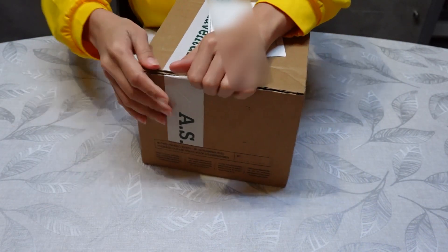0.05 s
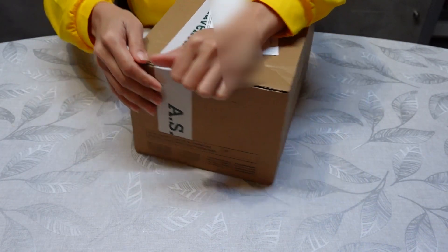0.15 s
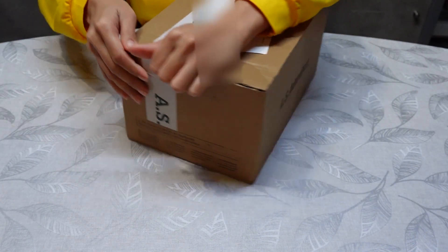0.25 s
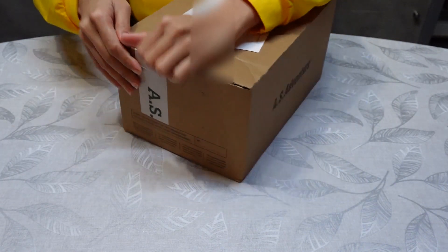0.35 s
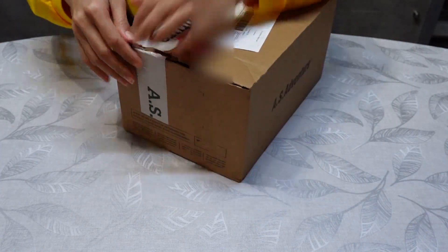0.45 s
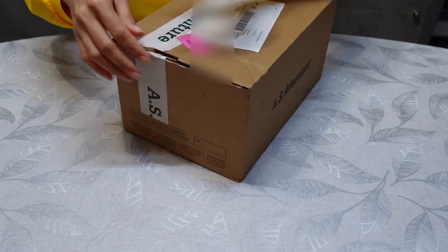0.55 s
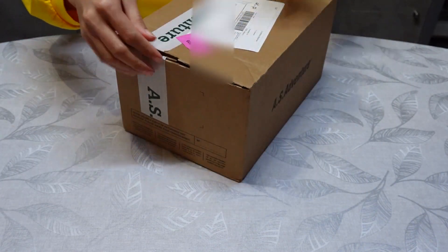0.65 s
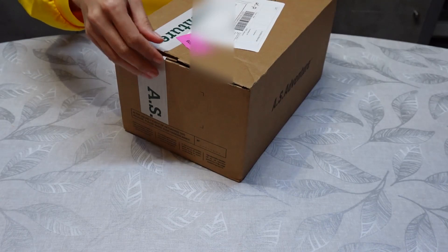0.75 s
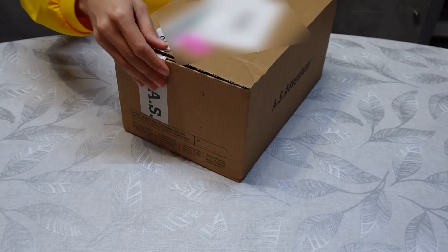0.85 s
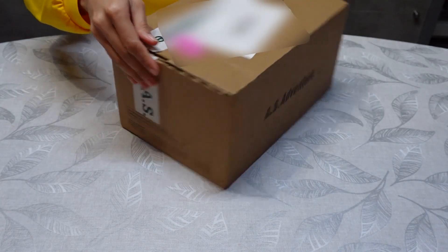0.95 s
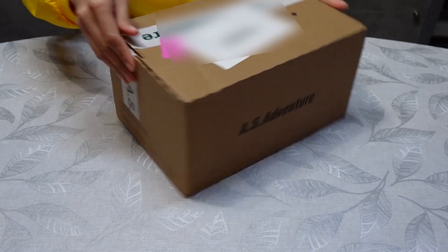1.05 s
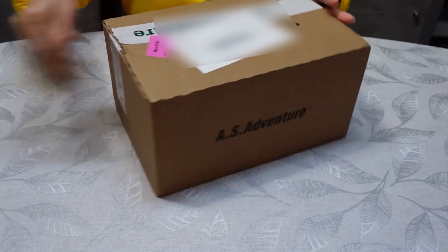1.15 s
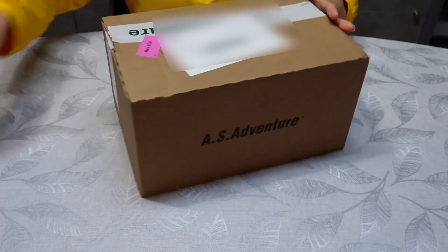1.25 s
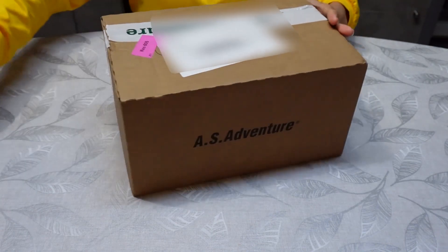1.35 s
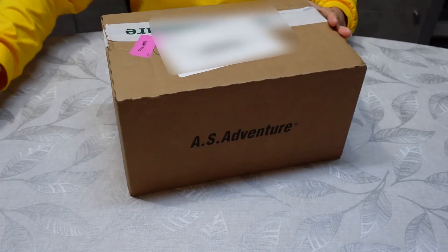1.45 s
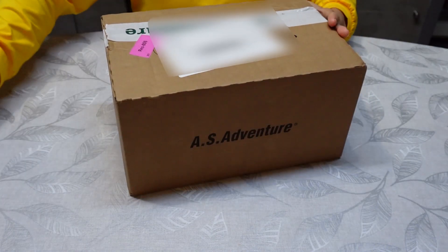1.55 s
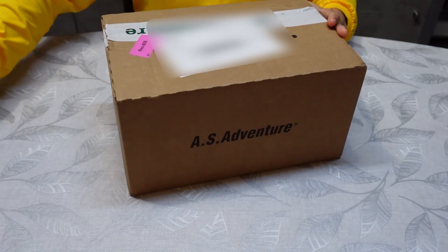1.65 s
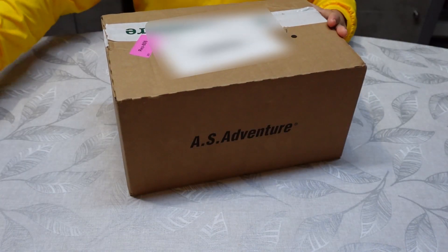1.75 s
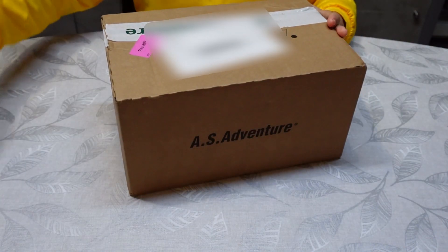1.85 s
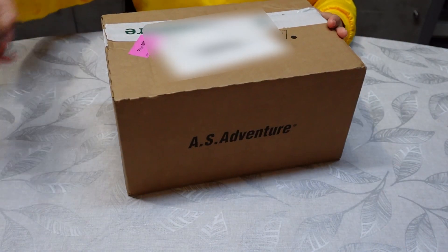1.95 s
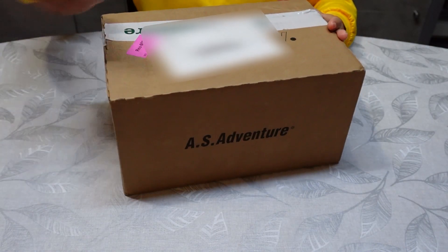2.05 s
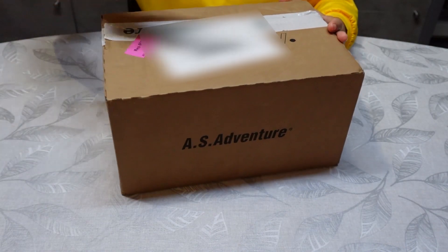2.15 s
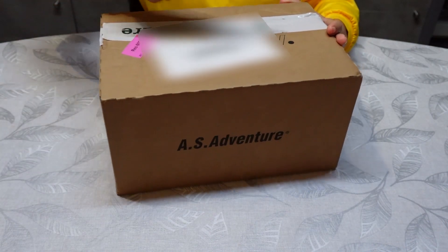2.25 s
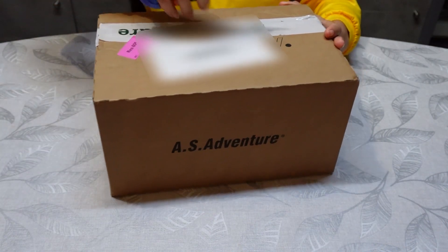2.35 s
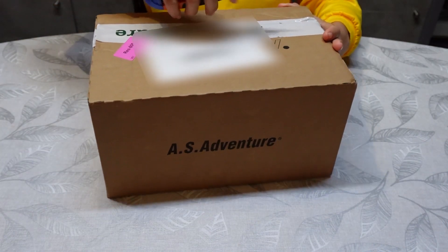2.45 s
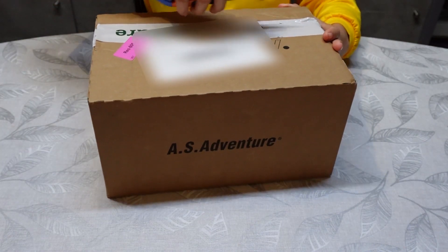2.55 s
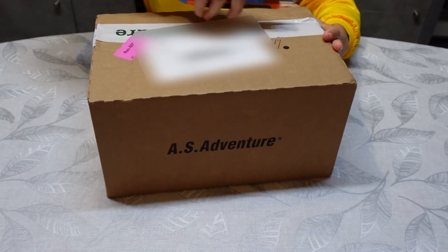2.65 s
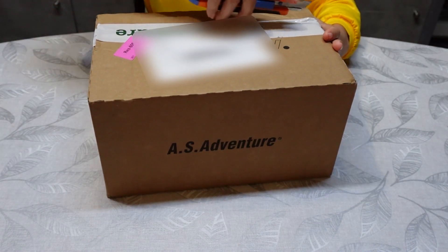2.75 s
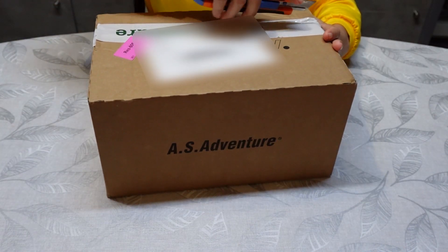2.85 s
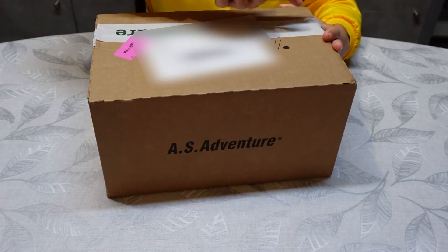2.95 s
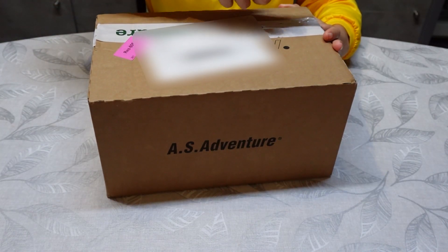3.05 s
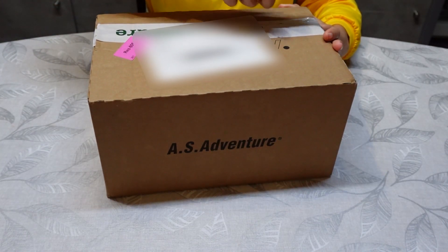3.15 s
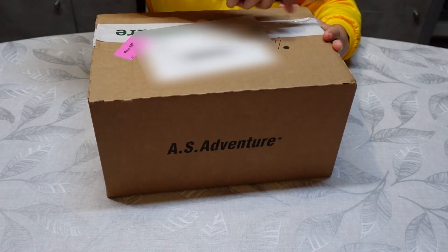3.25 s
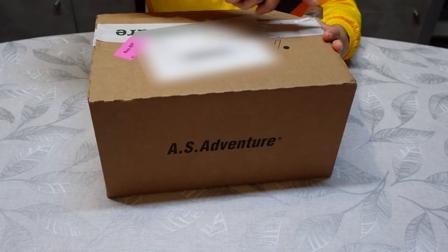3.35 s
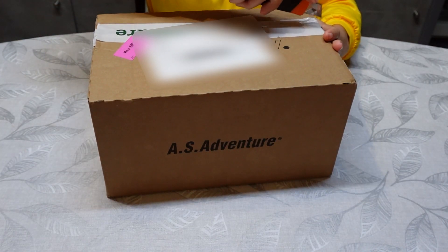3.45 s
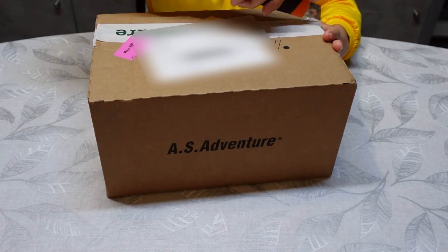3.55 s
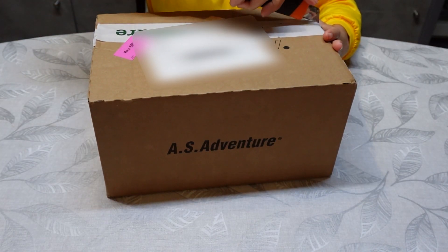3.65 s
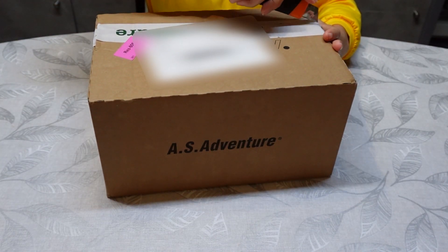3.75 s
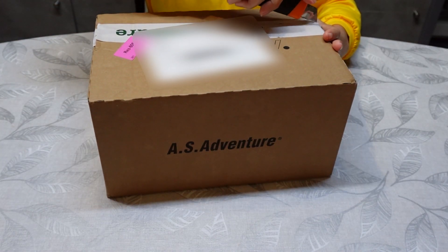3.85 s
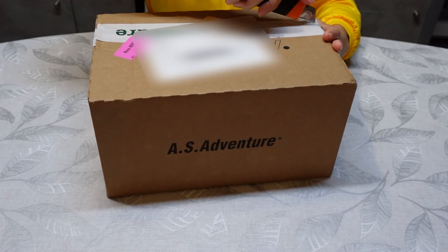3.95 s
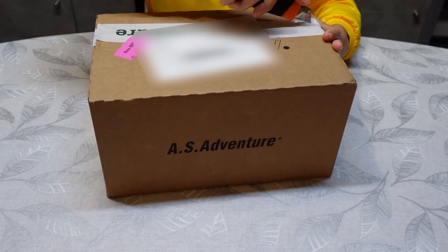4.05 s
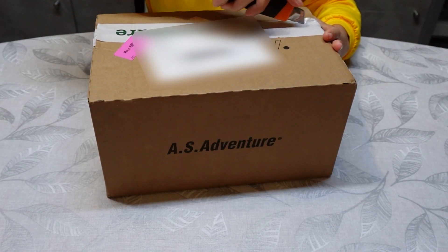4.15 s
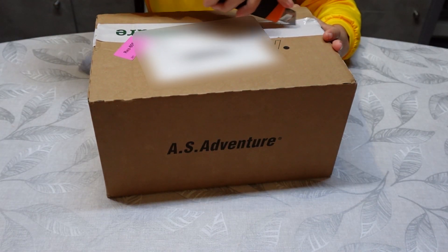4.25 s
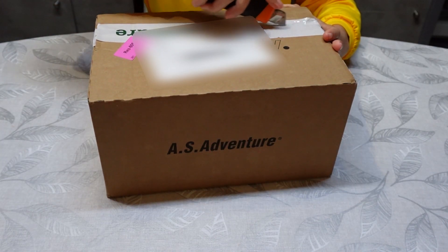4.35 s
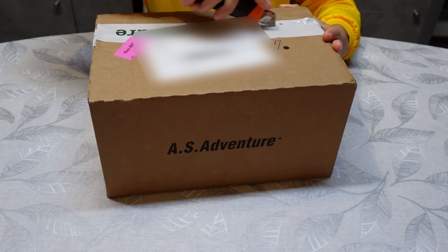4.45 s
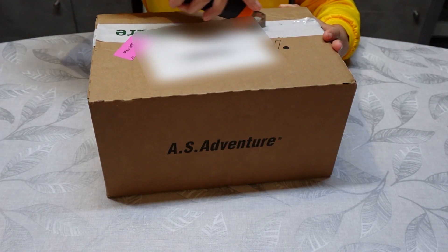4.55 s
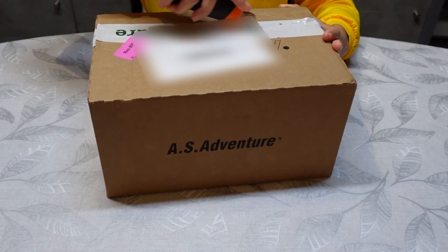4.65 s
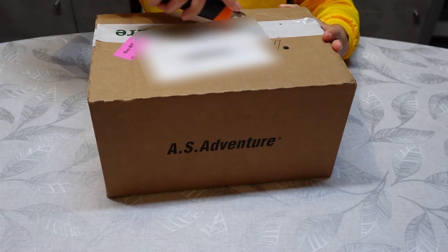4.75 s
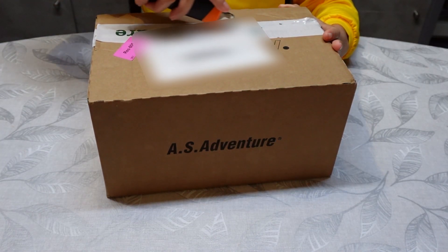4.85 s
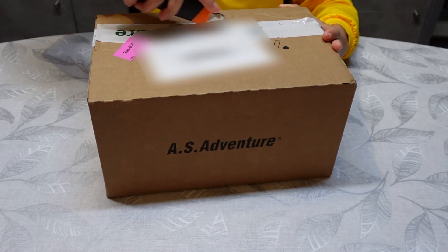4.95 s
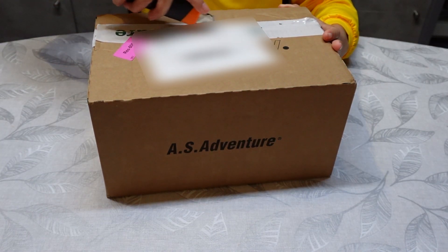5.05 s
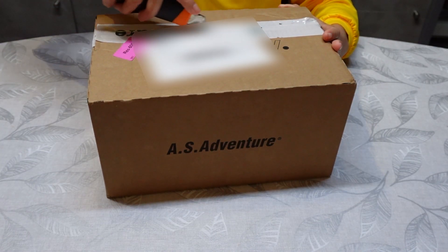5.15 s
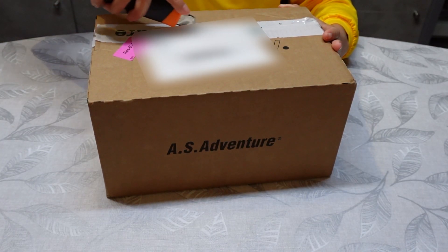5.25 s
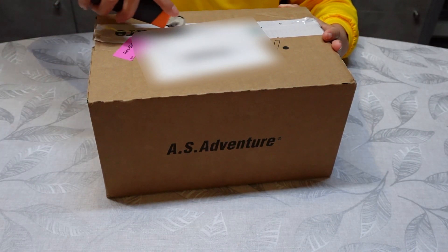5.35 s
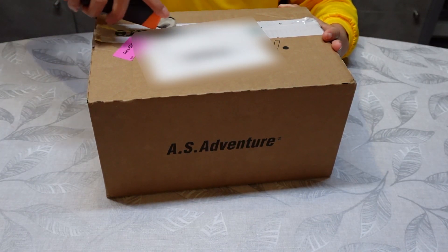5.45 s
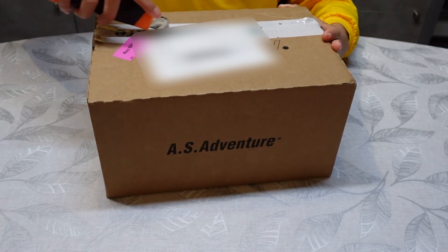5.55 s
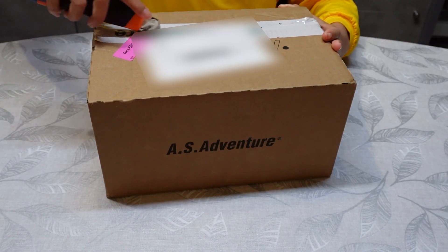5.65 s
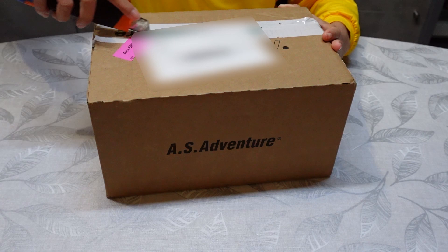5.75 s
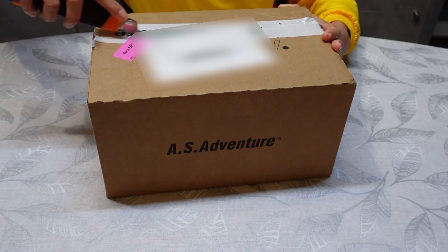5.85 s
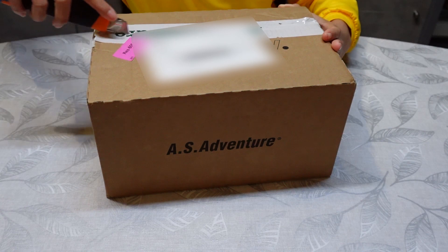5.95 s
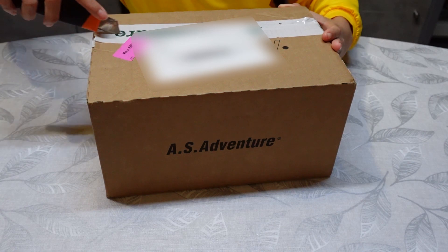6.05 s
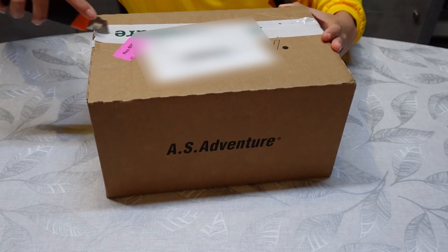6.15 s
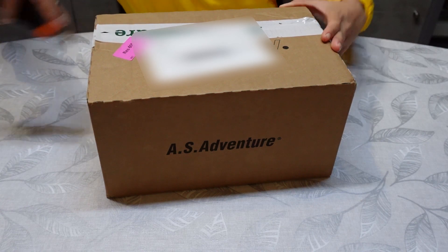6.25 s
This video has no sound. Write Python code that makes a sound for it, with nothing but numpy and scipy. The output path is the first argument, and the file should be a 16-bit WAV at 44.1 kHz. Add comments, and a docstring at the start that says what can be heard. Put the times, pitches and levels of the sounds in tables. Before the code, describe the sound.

A cardboard box hisses and bumps on a tablecloth, a utility knife clicks open, then its blade rasps in ragged strokes through packing tape.

```python
"""A small, lively room: a taped cardboard box is turned on a tablecloth, hissing and bumping.
A utility knife clicks in the hand, then its blade rasps through the packing tape,
catching on one ridge of the corrugated board after another.
Rubbing and tearing are trains of tiny random impulses, coloured by filters; hollow bumps are fading tones.
Everything except the faint hiss also feeds the room's echoes."""
import sys
import numpy as np
from scipy import signal
from scipy.io import wavfile
from scipy.ndimage import uniform_filter1d

SR = 44100
rng = np.random.default_rng(int(sys.argv[2]) if len(sys.argv) > 2 else 0)


def inscribe(sig):
    """Save sig as 16-bit PCM at rate SR to the path in sys.argv[1].

    A 1-D sig is mono; a 2-D sig holds one channel per row.
    Samples are clipped to [-1, 1] before scaling.
    """
    pcm = np.round(np.clip(np.atleast_2d(sig).T, -1, 1) * 32767)
    wavfile.write(sys.argv[1], SR, pcm.astype(np.int16))


N = 277830  # length in samples

# Levels in the tables come before each layer's own level setting.
# "brightness" blends a dull and a bright sound: -5 is all dull, +5 all bright, values beyond are clipped.

# the box sliding on the cloth, one list a push: start_s, level_db, brightness (-5 to 5)
SLIDES = [
    [(0.0, -29.5, 0.5), (0.09, -32, 0.5), (0.154, -36.5, 1), (0.24, -35, 1), (0.305, -32.5, 2),
     (0.396, -37, 0.5), (0.456, -33, 1.5), (0.47, -49, -1)],
    [(0.865, -40, 2.5), (0.975, -39.5, -0.5), (1.008, -29.5, 3.5), (1.077, -24, 3), (1.319, -36.5, 1),
     (1.4, -46, 3)],
]
# the colour of cardboard on cloth: pitch_hz, level_db
SLIDE_COLOUR = [(70, -53), (130, -28), (320, -12.5), (450, -11), (560, -25), (760, -18.5), (1100, 0),
                (1700, 7), (2300, 5.5), (3050, 8), (4300, 1), (6000, -6), (10000, -15.5), (15500, -22.5)]
# soft bumps of hands and box: start_s, level_db, pitch_hz
BUMPS = [(.046, -29.5, 236), (.066, -32, 202), (.070, -30.5, 349), (.127, -38, 333), (.19, -47, 214),
         (.872, -42.5, 164), (.925, -38.5, 300), (.951, -43.5, 227), (1.019, -47, 338), (1.164, -47.5, 305),
         (1.262, -51, 304), (1.468, -34, 295), (1.535, -42, 300), (1.733, -41, 305), (1.743, -47.5, 132),
         (1.762, -39.5, 376), (1.982, -54, 330), (3.660, -46.5, 379), (3.662, -58, 149)]
# short scuffs and clatters of handling: start_s, level_db, fade_s, treble_db_per_octave
SCUFFS = [(.865, -39.5, 0.018, 7.5), (0.906, -37.5, .02, 13), (1.429, -37.5, 0.0096, -2.5),
          (1.439, -32.5, 0.039, -1), (1.73, -33, 0.042, -1.5), (3.658, -41.5, 0.0097, -3.5)]
# the colour of the scuffs: pitch_hz, level_db
SCUFF_COLOUR = [(60, -35), (130, -22.5), (220, -15), (340, -6.5), (560, -22), (850, -10), (1250, -14.5),
                (1550, -7), (1850, -7), (2500, -2), (4500, -3), (7000, -6.5), (10000, -14), (15000, -17)]
# clicks of the knife and of fingernails on the box: # start_s, level_db, ring_hz, treble_db_per_octave
CLICKS = [(0.0627, -26.5, 1650, -1.5), (.954, -34, 2700, -9), (1.6887, -38, 2670, -2.5),
          (1.706, -36.5, 2820, -3), (1.9806, -42, 2570, -8), (2.0489, -22.5, 4000, -1),
          (2.127, -35, 3000, -4), (2.2995, -38.5, 3120, -2.5), (2.36, -35, 2720, -3),
          (2.3684, -26, 4400, -2), (2.7094, -38.5, 2780, -6), (2.759, -51, 2830, -3),
          (2.794, -48.5, 2820, -6), (2.92, -44.5, 2880, -7), (3.0035, -42.5, 3110, -1),
          (3.0328, -39, 3330, -7), (3.0382, -26.5, 3100, -5.5), (3.087, -41, 2600, -7),
          (3.149, -48, 2620, -6), (3.2645, -24.5, 3720, -1), (3.659, -34, 3680, 3),
          (3.8065, -24.5, 3430, 3), (3.928, -38, 2730, -2), (4.0312, -23, 2640, 2), (4.2097, -21, 4100, -4)]
# the colour of the knife: pitch_hz, level_db
KNIFE_COLOUR = [(300, -49), (750, -51), (1000, -27), (1350, -20.5), (1650, -5), (1900, -7.5), (2600, 3.5),
                (3300, 1.5), (4300, 1.5), (5500, -2.5), (8000, -3.5), (11000, -16.5), (16000, -34)]
# the blade tearing through a ridge: start_s, level_db
RIDGES = [(4.075, -36), (4.27, -45), (4.319, -32), (4.36, -36.5), (4.406, -35.5), (4.453, -36),
          (4.493, -38), (4.545, -34.5), (4.591, -32.5), (4.637, -36), (4.681, -34.5), (4.729, -38),
          (4.792, -36), (4.841, -26), (4.892, -23.5), (4.969, -28), (4.998, -33.5), (5.055, -32),
          (5.12, -22.5), (5.161, -29.5), (5.218, -28), (5.266, -26), (5.311, -28), (5.355, -29),
          (5.403, -24.5), (5.453, -25), (5.511, -27), (5.578, -28.5), (5.636, -26), (5.692, -27),
          (5.75, -25.5), (5.798, -28), (5.84, -30), (5.882, -28.5), (5.926, -30.5), (5.979, -28.5),
          (6.033, -27.5), (6.087, -30.5), (6.143, -25), (6.195, -27.5), (6.236, -27), (6.266, -26.5),
          (6.29, -25.5)]
# the board giving way at once: start_s, level_db
SNAPS = [(4.843, -28), (5.055, -26), (5.1198, -15), (5.312, -25), (5.513, -28), (6.237, -26)]
# the colour of tearing: pitch_hz, level_db
TEAR_COLOUR = [(200, -36.5), (450, -8.5), (700, -16.5), (850, -5.5), (1100, -3.5), (1500, 0), (2100, -1),
               (2800, -1.5), (4000, -6), (5500, -10.5), (8000, -14.5), (12000, -22), (16000, -29)]
# resonances of the box's panels: pitch_hz, width_hz, level_db
PANELS = [(143, 19, -17.5), (222.6, 27, -3.5), (305, 20.7, 3), (417.4, 20, 2.5), (456.2, 28, 5),
          (668, 18, -6), (799.5, 25, -1.5), (859, 27, -4), (1001, 38, -3.5), (1084, 17, -0.5),
          (1144, 20, -5.5), (1420, 140, -12.5)]
# narrow rings of the board, added to the tearing: pitch_hz, width_hz, level_db
BOARD_RINGS = [(930, 36, 3.5), (975, 56, 5), (1585, 41, 4.5), (1800, 50, -10), (2530, 87, -15),
               (2640, 90, 3.5), (3430, 51, 5), (3753, 58, 4), (4620, 160, 3.5)]
# time the room takes to fade by 60 dB: pitch_hz, fade_s
ROOM_T60 = [(150, 0.6), (400, 0.76), (1000, 0.71), (3000, 0.76), (7000, 0.64), (15000, 0.17)]
# strength of the room's tail: pitch_hz, level_db
ROOM_LEVEL = [(150, -6), (500, -3), (1500, -2), (4000, -2), (15000, -3)]
# the colour of the background hiss: pitch_hz, level_db
HISS_COLOUR = [(30, -35), (130, 0), (300, 2.5), (700, -4), (1500, 4.5), (3000, 3), (6000, 6.5), (15000, 9)]
# the slider scraping along the knife's handle: strongest_s, level_db, brightness (-5 to 5)
SCRAPES = [(2.042, -47, -3), (2.37, -52, -3.5), (2.77, -65, -4), (3.05, -54, -5), (3.268, -50, 12),
           (3.68, -59.5, 4), (3.85, -54, -3), (4.0, -53, 0)]
# the taut plastic film cracking: start_s, level_db
CRACKS = [(.451, -30), (4.157, -28), (4.1713, -22.5), (4.177, -33), (4.211, -31), (4.219, -27),
          (4.965, -26.5)]
# the colour of the cracks: pitch_hz, level_db
CRACK_COLOUR = [(300, -26), (1200, -13), (2600, 1.5), (7000, -1.5), (10000, -5.5), (15000, -9.5)]

HISS_DB = -63.5
EDGE_HZ = 16000  # upper limit of the recorder
TAPS = 4096  # filter length in samples
HZ = np.fft.rfftfreq(TAPS, 1 / SR)
BUMP_T60_S = 0.099  # time for a bump's note to fade by 60 dB
RING_WIDTH_HZ, CLICK_RING_DB = 560, 5
# brighter clicks are shorter: each such treble lift per octave halves the rattle
RATTLE_S, RATTLE_HALVING_DB = .0028, 12
SCRAPE_RISE_S, SCRAPE_FALL_S, SCRAPE_RANGE_DB = .06, 0.29, 22
# the blade crosses the lid from edge to edge; either corner is stiff
CUT_START_S, CUT_END_S = 4.03, 6.5
CORNER_S, DEEP_CORNER_S = 0.29, 0.73  # the deep panels feel a corner from further away
# the tip first scratches lightly on the tape, then bites and drags
SCRATCH_DB, BITE_S, BITE_RISE_S = -9, 4.15, 0.042
DRAG_DB, DRAG_SAG_DB_PER_S = -40.5, 0.8
# before a ridge the drag drops by this share of the ridge's level above STALL_FROM_DB
STALL_S, STALL_FROM_DB, STALL_SHARE = .025, -32.5, 0.44
# length and level of a usual tear; each such step louder, it is over in half the time
RIDGE_S, RIDGE_DB, RIDGE_HALVING_DB = 0.012, -29, 15.5
BOOM_LAG = 0.48  # share of a tear's extra level that the heavy box does not follow


def amp(db):
    """Turns decibels into gain."""
    return 10 ** (np.asarray(db) / 20)


def unit(x):
    """Scales a sound to an rms level of 1."""
    return x / np.sqrt(np.mean(x ** 2) + 1e-20)


def read(points, hz=HZ):
    """Reads a table's value at each pitch, along a logarithmic pitch axis."""
    table_hz, value = np.transpose(points)
    return np.interp(np.log(hz + 1), np.log(table_hz), value)


def add(mix, s, sound):
    """Mixes a sound in at s seconds."""
    part = mix[max(round(s * SR), 0):][:len(sound)]
    part += sound[:len(part)]


def seconds(length):
    """Gives the time axis of a short sound."""
    return np.arange(int(length * SR)) / SR


def peaks(modes):
    """Gives the power response of a set of resonances."""
    return sum(amp(db) ** 2 / (1 + ((HZ ** 2 - hz ** 2) / (width * HZ + 1e-9)) ** 2)
               for hz, width, db in modes)


def lift(db_per_octave):
    """Tilts the treble up or down around 3000 Hz; the gain is level below 800 Hz."""
    return amp(db_per_octave * np.log2(np.maximum(HZ, 800) / 3000))


def colour(x, gain):
    """Filters with unit energy; like a struck object, it rings after a blow, never before."""
    log_gain = np.log(np.maximum(gain / gain.max(), 1e-5))
    circle = np.r_[log_gain, log_gain[-2:0:-1]]
    # the Hilbert transform finds the phase that puts the energy first (minimum phase)
    response = np.fft.ifft(np.exp(np.conj(signal.hilbert(circle)))).real
    return signal.fftconvolve(x, response / np.linalg.norm(response))


def grains(n, per_s, spread_db):
    """Fibres catch and let go: a dense train of tiny impulses of uneven size."""
    chance = rng.random(n)
    size = rng.exponential(1, n)
    push = rng.choice([-1., 1.], n)
    return unit((chance < per_s / SR) * push * amp(spread_db * np.minimum(size, 3)))


def rub(rows, gain, per_s, spread_db):
    """Continuous friction: impulses whose level and brightness follow the stroke."""
    s, db, brightness = np.transpose(rows)
    t = s[0] + seconds(s[-1] - s[0])
    drive = grains(len(t), per_s, spread_db)
    dull = colour(drive, gain * lift(-5))[:len(t)]
    bright = colour(drive, gain * lift(5))[:len(t)]
    share = np.clip(.5 + np.interp(t, s, brightness) / 10, 0, 1)
    fade = np.clip(np.minimum(t - t[0], t[-1] - t) / 0.00084, 0, 1)
    return amp(np.interp(t, s, db)) * fade * unit((1 - share) * dull + share * bright)


def slides(level_db=-9.5):
    """Cardboard hisses over the weave of the cloth."""
    out = np.zeros(N)
    for rows in SLIDES:
        add(out, rows[0][0], rub(rows, amp(read(SLIDE_COLOUR)), per_s=9000, spread_db=-0.5))
    return amp(level_db) * out


def hiss():
    """The quiet room and the microphone's own noise: coloured random noise."""
    return amp(HISS_DB) * colour(rng.standard_normal(N), amp(read(HISS_COLOUR)))[:N]


def echoes(onset=0.0035, echo=0.063):
    """Table and box throw back early echoes; a diffuse tail dies at its own pace in each pitch band."""
    t = seconds(1.0)
    reflected = rng.random(len(t)) < 5000 / SR
    taps = rng.choice([-1., 1.], len(t)) * reflected * np.clip(t / onset - 1, 0, 1)
    hz, at, bands = signal.stft(taps, SR, nperseg=256)
    t60 = read(ROOM_T60, hz)[:, None]
    # the square root gives every band the same energy, however long its tail
    decay = np.exp(-np.log(1000) * at / t60) * np.sqrt(2 * np.log(1000) / (t60 * SR))
    shaped = bands * decay * amp(read(ROOM_LEVEL, hz))[:, None]
    response = signal.istft(shaped, SR, nperseg=256)[1] / taps.std()
    for delay, gain in [(.0016, echo), (.0065, 0.13), (.0133, 0.16)]:
        add(response, delay * rng.uniform(.85, 1.15), np.array([gain]))
    return response


def room(x, count=6, step=.06):
    """Echo patterns take turns on a fixed cycle, crossfading, so no single pattern colours the whole sound."""
    place, out = np.arange(N) / SR / step, np.zeros(N)
    for k in range(count):
        # distance from this pattern's turn, in steps around the cycle
        away = np.minimum(abs((place - k + count / 2) % count - count / 2), 1)
        share = np.cos(np.pi / 2 * away)
        out += signal.fftconvolve(x * share, echoes())[:N]
    return out


def bumps(level_db=-2, rise=0.0039, knock=0.37, flutter=0.053):
    """Each bump rings one hollow note of the box, with a dull knock of its panels."""
    out, t = np.zeros(N), seconds(0.28)
    for s, db, hz in BUMPS:
        # the grip changes the panel's stiffness, so the note wanders
        wander = unit(uniform_filter1d(rng.standard_normal(len(t)), size=700))
        pitch = hz * (1 + flutter * wander)
        envelope = amp(-60 * t / BUMP_T60_S) * (1 - np.exp(-t / rise))
        note = np.sin(2 * np.pi * np.cumsum(pitch) / SR) * envelope
        blow = grains(len(t), per_s=5000, spread_db=3.6) * np.exp(-t / 0.0099)
        thud = colour(blow, peaks([(hz, 150, 0), (430, 120, -2)]))[:len(t)]
        add(out, s, amp(db + level_db) * (note + knock * thud))
    return out


def clicks(level_db=-9, tick=0.54, rise=0.0005):
    """A hard tick and a brief rattle ring the small parts that were struck."""
    out, t = np.zeros(N), seconds(.04)
    for s, db, hz, treble in CLICKS:
        length = RATTLE_S * .5 ** (treble / RATTLE_HALVING_DB)
        rattle = grains(len(t), per_s=9000, spread_db=1.5) * np.exp(-t / length) * (1 - np.exp(-t / rise))
        drive = rattle / np.linalg.norm(rattle) + tick * (t == 0)
        ring = np.sqrt(0.5 + peaks([(hz, RING_WIDTH_HZ, CLICK_RING_DB)]))
        sound = colour(drive, amp(read(KNIFE_COLOUR)) * ring * lift(treble))
        # every click gets the same energy before its table level
        add(out, s, amp(db + level_db) * np.sqrt(0.0062 * SR) * sound / np.linalg.norm(sound))
    return out


def cracks(level_db=-7, fade=0.0018, tick=0.56):
    """Taut plastic film cracks: one very sharp tick and a short splutter."""
    out, t = np.zeros(N), seconds(.02)
    for s, db in CRACKS:
        splutter = grains(len(t), per_s=6000, spread_db=3) * np.exp(-t / fade)
        drive = splutter / np.linalg.norm(splutter) + tick * (t == 0)
        sound = colour(drive, amp(read(CRACK_COLOUR)))
        add(out, s, amp(db + level_db) * np.sqrt(0.0056 * SR) * sound / np.linalg.norm(sound))
    return out


def scuffs(level_db=0):
    """A sudden contact chatters away: a burst of impulses that fades."""
    out, t = np.zeros(N), seconds(0.18)
    for s, db, fade, treble in SCUFFS:
        drive = grains(len(t), per_s=3500, spread_db=3) * np.exp(-t / fade)
        add(out, s, amp(db + level_db) * colour(drive, amp(read(SCUFF_COLOUR)) * lift(treble)))
    return out


def fiddle(level_db=-2, hollow_hz=2850, hollow_width_hz=600, hollow_db=-1):
    """Fingers and slider scrape softly on the knife's hollow handle; each push swells quickly and dies away."""
    out = np.zeros(N)
    hollow = np.sqrt(0.5 + peaks([(hollow_hz, hollow_width_hz, hollow_db)]))
    gain = amp(read(KNIFE_COLOUR)) * hollow
    for s, db, brightness in SCRAPES:
        start, end, faint_db = s - SCRAPE_RISE_S, s + SCRAPE_FALL_S, db - SCRAPE_RANGE_DB
        push = [(start, faint_db, brightness), (s, db, brightness), (end, faint_db, brightness)]
        add(out, start, amp(level_db) * rub(push, gain, per_s=2500, spread_db=1.0))
    return out


def stiffness(s, reach=CORNER_S):
    """How stiff the lid is under the blade: 1 at its edges, near 0 in the middle."""
    return np.exp(-(np.minimum(s - CUT_START_S, CUT_END_S - s) / reach) ** 2)


def panels(spread_db):
    """The box's response; each spot under the blade drives its panels in other proportions."""
    modes = [(hz, width, db + spread_db * rng.standard_normal()) for hz, width, db in PANELS]
    tone = amp(read([(30, 2), (70, -12), (130, 1.5), (1300, 4.0), (3000, -11.5)]))
    return np.sqrt(peaks(modes)) * tone


def drag(tear, rasp_db=-1, edge_rasp_db=-2, hum_db=-6.5, edge_hum_db=-5, tilt=-0.2, edge_tilt=5):
    """The blade rasps on through the tape and keeps the lid humming; it stalls just before a loud ridge."""
    s = np.arange(CUT_START_S, N / SR, .002)
    stiff = stiffness(s)
    scratch_db = SCRATCH_DB * np.clip((BITE_S - s) / BITE_RISE_S, 0, 1)
    db = DRAG_DB + scratch_db - DRAG_SAG_DB_PER_S * (s - CUT_START_S)
    for at, ridge_db in RIDGES:
        stalled = (at - STALL_S < s) & (s < at)
        db = db - STALL_SHARE * max(ridge_db - STALL_FROM_DB, 0) * stalled
    brightness = tilt + edge_tilt * stiff
    lid = panels(0) * np.sqrt(1 + peaks([(490, 150, 1)]))
    rasp_rows = np.c_[s, db + rasp_db + edge_rasp_db * stiff, brightness]
    hum_rows = np.c_[s, db + hum_db + edge_hum_db * stiff, brightness]
    out = np.zeros(N)
    add(out, CUT_START_S, rub(rasp_rows, tear, per_s=3200, spread_db=4.5))
    add(out, CUT_START_S, rub(hum_rows, lid, per_s=3000, spread_db=4))
    return out


def ridges(tear, ridge_db=-1, boom_db=-5, edge_boom_db=-19, spread_db=3, rock=0.42, edge_deep_db=-4,
           tilt_db=1.57, edge_tilt_db=4, rise=0.002, release=0.0034, local_db=1, local_width_hz=260):
    """The blade bursts through each ridge and tugs the box: brighter, with less boom, near the stiff edges."""
    out, t = np.zeros(N), seconds(0.059)
    deep = read([(330, 1), (430, 0)])  # 1 for the deep panels, 0 for the rest
    for s, db in RIDGES:
        extra_db, stiff = db - RIDGE_DB, stiffness(s)
        length = RIDGE_S * .5 ** (extra_db / RIDGE_HALVING_DB)
        force = np.clip(t / rise, 0, 1) * np.exp(-np.maximum(t - length, 0) / release)
        strength = np.linalg.norm(force)
        # each spot of the board rings a little differently
        spot_rings = [(hz, local_width_hz, local_db) for hz in rng.uniform(1130, 4900, size=3)]
        spot = np.sqrt(9.5 + peaks(spot_rings))
        rip_gain = tear * spot * lift(tilt_db + edge_tilt_db * stiff)
        rip = colour(force * grains(len(t), per_s=6000, spread_db=1.5), rip_gain)
        add(out, s - .001, amp(db + ridge_db) * rip * strength / np.linalg.norm(rip))
        # harder tugs rock the large, deep panels more, most of all in the middle of the lid
        deep_db = rock * extra_db + edge_deep_db * stiffness(s, DEEP_CORNER_S)
        box = panels(spread_db) * amp(deep_db * deep)
        boom = colour(force * grains(len(t), per_s=6000, spread_db=2.5), box)
        shake_db = db + boom_db - BOOM_LAG * extra_db + edge_boom_db * stiff
        # the boom starts slightly after the rip
        add(out, s + 0.002095, amp(shake_db) * boom * strength / np.linalg.norm(boom))
    return out


def snaps(tear, snap_db=-2, thump_db=-6):
    """The board gives way at once: a single impulse makes a sharp tear and a low thump."""
    out = np.zeros(N)
    thump = amp(read([(30, -31), (120, -18), (280, 5), (450, -9), (900, -20)]))
    for s, db in SNAPS:
        blow = amp(db) * np.array([6.])
        add(out, s, amp(snap_db) * colour(blow, tear) + amp(thump_db) * colour(blow, thump))
    return out


def cut():
    """The blade drags through the tape, bursts through ridges and snaps board, all with one tearing colour."""
    tear = amp(read(TEAR_COLOUR)) * np.sqrt(1 + peaks(BOARD_RINGS))
    return drag(tear) + ridges(tear) + snaps(tear)


def scene(box_wet_db=0, knife_wet_db=0, cut_wet_db=-0.5):
    """Mixes the sources; each sends its own share into the room."""
    box = slides() + bumps() + scuffs()
    knife = clicks() + fiddle() + cracks()
    blade = cut()
    echo = room(amp(box_wet_db) * box + amp(knife_wet_db) * knife + amp(cut_wet_db) * blade)
    return (box + knife + blade + echo + hiss())[None]


def record(dry, low_cut_hz=85, order=2):
    """The microphone loses the deep bass; then the recorder cuts off the highest treble."""
    bass_cut = signal.butter(order, low_cut_hz, "high", fs=SR, output="sos")
    treble_cut = signal.firwin(511, EDGE_HZ, window=("kaiser", 9), fs=SR)
    return signal.oaconvolve(signal.sosfilt(bass_cut, dry), treble_cut[None], "same")


dry = scene()
out = record(dry)
inscribe(out)
```